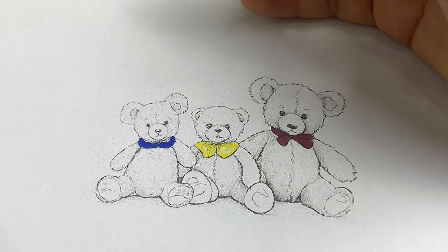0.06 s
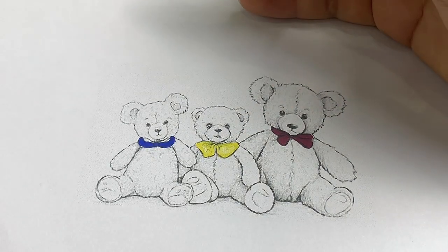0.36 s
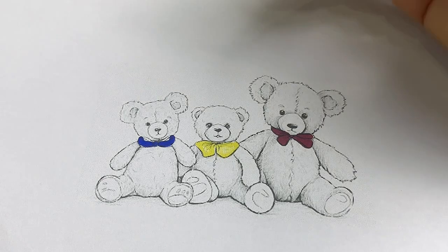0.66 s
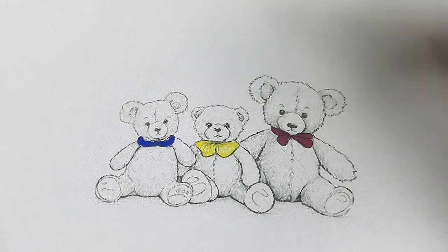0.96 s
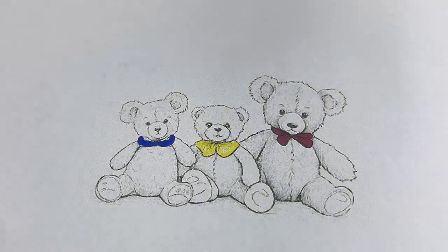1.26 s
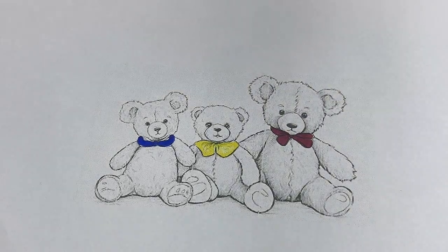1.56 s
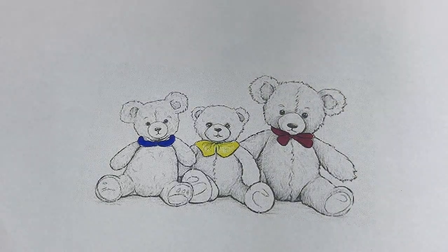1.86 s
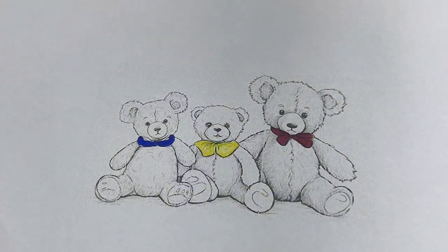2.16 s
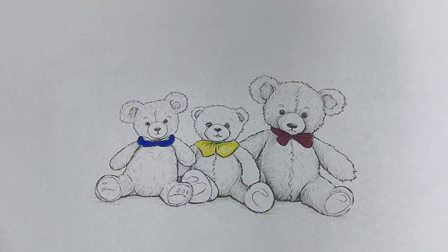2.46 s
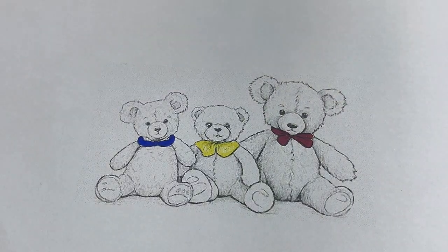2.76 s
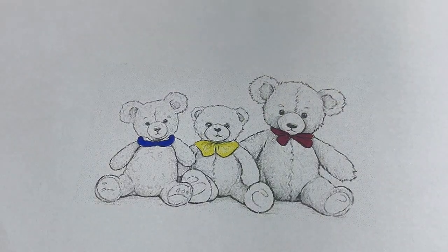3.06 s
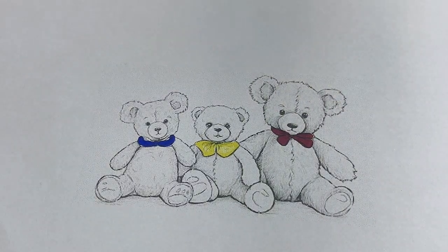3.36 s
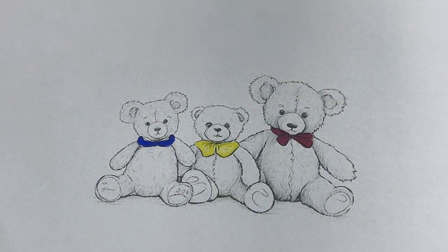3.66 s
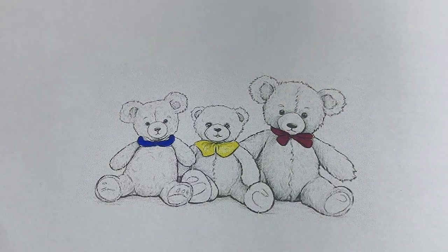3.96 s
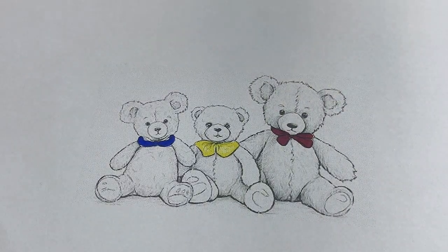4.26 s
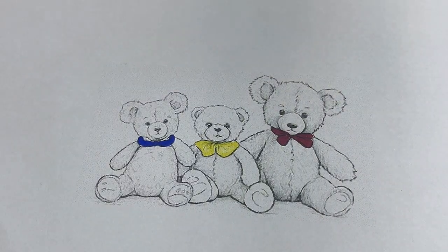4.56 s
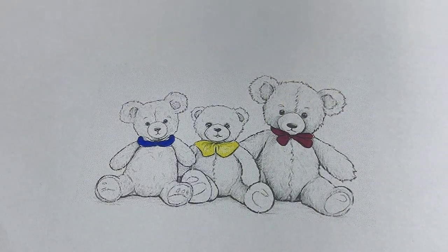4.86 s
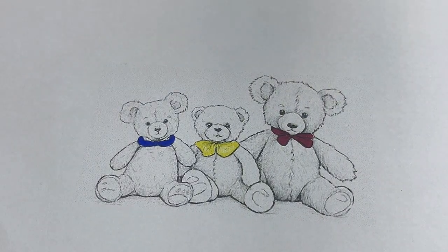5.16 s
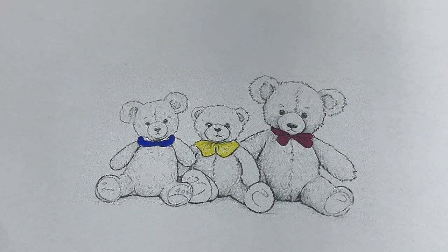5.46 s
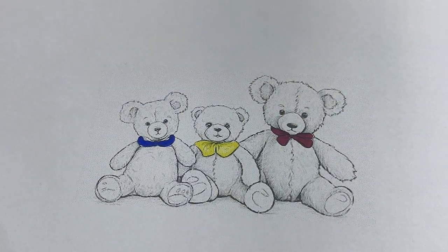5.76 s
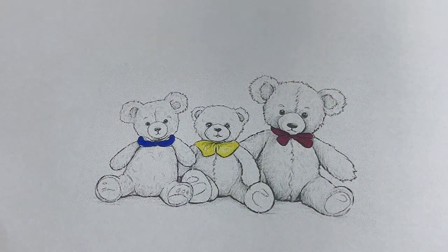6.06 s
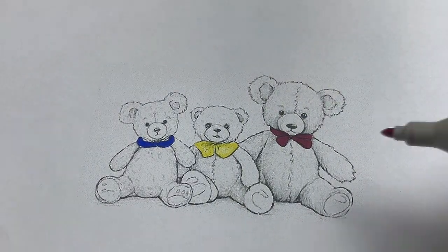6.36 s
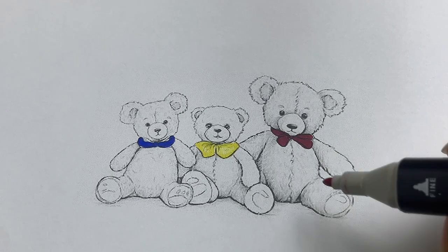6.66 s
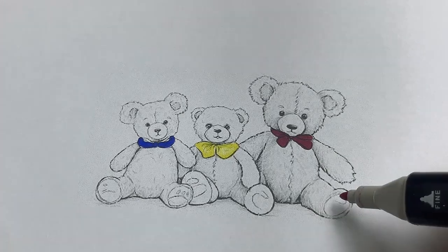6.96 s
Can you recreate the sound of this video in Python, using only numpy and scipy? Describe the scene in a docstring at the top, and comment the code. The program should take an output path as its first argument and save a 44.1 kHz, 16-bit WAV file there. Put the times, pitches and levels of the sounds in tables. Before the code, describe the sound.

A low steady hum and faint hiss fill a quiet small room, with all the handling close to the microphone. A sleeve begins rustling softly at about 1 second. Around 2 seconds a plastic cap ticks several times against a felt-tip marker, rubs down the barrel and snaps shut crisply at 2.3 seconds, with a short room echo. From 3 to 4 seconds there is a soft desk bump, a small tick and a sleeve brushing paper. At about 4.3 seconds another marker scrapes out of a pile, ending in light ticks. Faint squeaks and a click come near 5 seconds, then the cap pulls off with a sharp clack at 5.3 seconds, the loudest moment. Short plastic slides, dull hand rubs and more rustling follow around 6 seconds, and the hand settles on the paper with a soft thud at about 7 seconds.

```python
"""Swapping felt-tip markers

At a desk in a quiet, humming room, close to one microphone, a cap ticks against its barrel, rubs home
and snaps shut. A sleeve rustles, the next marker scrapes out of the pile and its cap comes off with a
clack; plastic slides in short strokes and the hand settles on the paper. Impacts excite damped modes
of the plastic, sliding friction makes noise from many tiny slips, and the walls add a short echo."""
import sys
import numpy as np
from scipy import signal
from scipy.fft import rfft, irfft, next_fast_len
from scipy.io import wavfile
from scipy.ndimage import uniform_filter1d

SR = 44100
rng = np.random.default_rng(int(sys.argv[2]) if len(sys.argv) > 2 else 0)


def unload_audio(sound):
    """Save the sound as a 16-bit wav file, at the path given as the first command line argument."""
    columns = np.transpose(np.atleast_2d(sound))
    # keep every value between -1 and 1, then stretch to whole-number steps
    steps = np.round(np.clip(columns, -1, 1) * 32767)
    wavfile.write(sys.argv[1], SR, steps.astype(np.int16))


N = 317449
TIME = np.arange(N) / SR


def undb(db):
    """Amplitude ratio of a level in decibels."""
    return 10 ** (np.asarray(db) / 20)


def unit(x):
    """Normalisation to rms 1."""
    return x / np.sqrt(np.mean(x ** 2) + 1e-20)


def unit_energy(x):
    """Normalisation to energy 1."""
    return x / np.sqrt(np.sum(x ** 2) + 1e-20)


def at_level(x, db):
    """Equivalent level: x gets the energy of 5 ms of sound at an rms level of db."""
    return undb(db) * unit_energy(x) * np.sqrt(SR / 200)


def fade(t, t60):
    """Exponential decay, by 60 dB in t60 seconds."""
    return np.exp(-np.log(1000) * t / max(t60, 1e-4))


def add(out, start, x):
    """Superposition of x on out from start seconds."""
    i = int(start * SR)
    out[i:i + len(x)] += x[:N - i]


def colour(x, points, tilt_db=0):
    """Minimum-phase filter through (f/Hz, gain/dB) points, tilted by tilt_db an octave."""
    size = 2 * next_fast_len(len(x) // 2 + 1024)
    hz, db = np.transpose(points)
    octave = np.log2(np.maximum(np.arange(size // 2 + 1) * SR / size, 1))
    gain_db = np.interp(octave, np.log2(hz), db)
    gain_db += tilt_db * np.clip(octave, np.log2(hz[0]), np.log2(hz[-1]))
    cepstrum = irfft(gain_db * np.log(10) / 20)
    cepstrum[1:size // 2] *= 2  # folding the cepstrum makes the filter causal
    cepstrum[size // 2 + 1:] = 0
    return irfft(rfft(x, size) * np.exp(rfft(cepstrum)))[:len(x)]


def wander(rate):
    """Random modulation of rms 1, interpolated between rate values a second."""
    hold = int(SR / rate)
    steps = np.repeat(rng.standard_normal(N // hold + 1), hold)
    return unit(uniform_filter1d(steps, hold)[:N])


def friction(n, rate, spread_db):
    """Sliding friction as shot noise: on average rate slips a second, of uneven size."""
    slips = rng.random(n) < rate / SR
    return unit(slips * rng.standard_normal(n) * undb(spread_db * np.minimum(rng.exponential(size=n), 4)))


def slides(events, spectrum, rate, spread_db):
    """Friction noise follows sliding speed, which rises linearly and dies away exponentially."""
    out, t = np.zeros(N), TIME[:SR // 2]
    for start, db, rise, t60, tilt_db in events:
        speed = np.minimum(t / rise, 1) * fade(np.maximum(t - rise, 0), t60)
        noise = unit(colour(friction(len(t), rate, spread_db), spectrum, tilt_db))
        add(out, start, undb(db) * speed * noise)
    return out


def impacts(events, spectrum, modes, ring_db, rattle_db):
    """Impact sound: an impulse, a quick rattle on hand and desk, and free decay of the plastic's modes."""
    out, t = np.zeros(N), TIME[:SR // 10]
    ring = unit_energy(sum(undb(db) * np.exp(-np.pi * width * t) * np.sin(2 * np.pi * hz * t)
                           for hz, width, db in modes))
    for start, db, tilt_db, t60 in events:
        force = undb(rattle_db) * unit_energy(rng.standard_normal(len(t)) * fade(t, t60))
        force[0] += 1
        sound = colour(force + undb(ring_db) * ring, spectrum, tilt_db)
        add(out, start, at_level(sound, db))
    return out


def room_tone():
    """Stationary background: broadband air noise, with narrow noise bands heard as hum and faint whine."""
    # air spectrum: f/Hz, gain/dB
    spectrum = [(15, -35), (25, -33), (43, -8), (97, -10), (134, -4), (170, -6), (439, -19.5), (489, -22),
                (796, -25.5), (1070, -26), (1190, -27), (2280, -36), (2610, -32.5), (4490, -35.5),
                (16000, -51.5)]
    # hum and whine lines: f/Hz, bandwidth/Hz, level/dB
    hum_lines = [(48.4, 8.2, -68), (83.5, 8, -62.5), (128.1, 10, -57), (146.5, 3, -57.5), (207.2, 10, -62),
                 (244.2, 4, -62.5), (289.3, 10, -62.5), (2720, 120, -79.5), (4490, 60, -78)]
    air = undb(-51) * unit(colour(rng.standard_normal(N), spectrum))
    for hz, width, db in hum_lines:
        phase = 2 * np.pi * hz * TIME
        air += undb(db) * unit(wander(2 * width) * np.sin(phase) + wander(2 * width) * np.cos(phase))
    return air


def reverberation(x, wet_db, t60, build_s):
    """The diffuse field of a small furnished room builds up, then decays exponentially."""
    # spectrum of the reflections: f/Hz, gain/dB
    spectrum = [(200, 0), (1200, -1), (3000, 0), (8000, 2), (15000, -7.5)]
    t = TIME[:SR]
    build_up = 1 - np.exp(-(t / build_s) ** 2)
    tail = colour(rng.standard_normal(SR), spectrum) * fade(t, t60) * build_up
    return undb(wet_db) * signal.fftconvolve(x, unit_energy(tail))[:N]


def desk_thuds():
    """Structure-borne sound: the desk passes mainly the low frequencies of soft contacts."""
    # thuds: t/s, level/dB, rise/s, T60/s, tilt/(dB/octave)
    thuds = [(3.02, -45, 0.024, 0.68, -5.5), (5.38, -42.5, 0.0092, 0.46, 1.5),
             (5.46, -42, 0.028, 0.95, 2.5), (6.09, -48, 0.016, 0.83, -0.5),
             (7.058, -35, 0.0036, 0.096, 2.5)]
    # desk response: f/Hz, gain/dB
    spectrum = [(35, -16), (80, 3.5), (130, -4), (250, -5), (400, -16.5), (1000, -37), (4000, -70)]
    return slides(thuds, spectrum, rate=3000, spread_db=2.5)


def hiss_and_rustle():
    """Incoherent sources add in power: steady microphone hiss and a sleeve's fibres brushing paper."""
    # sweeps of the sleeve: middle t/s, duration/s, level/dB, brightness/dB
    sweeps = [(0.9, 0.18, -56, 15), (1.266, 0.16, -56, 11), (1.523, 0.2, -59.5, 1), (1.75, 0.32, -59, 7),
              (2.57, 0.45, -56.5, 4), (3.14, 0.44, -55, 9), (3.446, 0.25, -46.5, 9), (3.58, 0.28, -43, 4.5),
              (3.868, 0.29, -45, 4), (5.09, 0.43, -50.5, 12), (5.8, 0.23, -52.5, 6), (5.93, 0.14, -48.5, 6),
              (6.18, 0.15, -49.5, 3), (6.5, 0.86, -55, 1), (6.81, 0.17, -50.5, 5), (7.023, 0.34, -55, 0.5)]
    # noise spectrum: f/Hz, gain/dB
    spectrum = [(400, -14.5), (700, -10.5), (1100, -5), (1600, -6.5), (2700, -6), (5500, -7), (8300, -3.5),
                (11000, -8), (13700, -2.5), (16000, -9)]
    microphone_hiss = (np.ones(N), -61, 9.5)  # envelope, level/dB, brightness/dB
    light_rustle = (np.clip((TIME - 0.83) / .04, 0, 1), -57.5, 1.5)  # the sleeve starts at 0.83 s
    layers = [microphone_hiss, light_rustle]
    for middle, length, db, bright_db in sweeps:
        speed = np.cos(np.pi * np.clip((TIME - middle) / length, -.5, .5))
        layers.append((speed, db, bright_db))
    treble_gain = np.sqrt(sum((envelope * undb(db)) ** 2 for envelope, db, _ in layers))
    body_gain = np.sqrt(sum((envelope * undb(db - bright_db)) ** 2 for envelope, db, bright_db in layers))
    noise = unit(colour(friction(N, rate=18000, spread_db=0), spectrum))
    body = signal.sosfiltfilt(signal.butter(3, 7000, fs=SR, output="sos"), noise)
    flutter = undb(.7 * wander(35))
    return flutter * (treble_gain * (noise - body) + body_gain * body)


def hand_rubs():
    """Friction of hand and marker gives dull noise, weak in the treble."""
    # rubs: t/s, level/dB, rise/s, T60/s, tilt/(dB/octave)
    rubs = [(1.22, -55.5, 0.026, .2, 1.5), (2.074, -49, .01, 0.8, -3.5), (2.165, -43.5, 0.003, 0.22, -2.5),
            (5.19, -53, 0.017, 0.58, 0), (5.362, -44, .005, 0.82, 0.5), (5.435, -41, 0.018, 0.29, 0.5),
            (6.18, -47, 0.01, 0.22, -1.5), (6.42, -47.5, 0.032, 0.5, -6), (6.571, -43, 0.0047, 0.31, -5),
            (7.001, -39.5, 0.0013, 0.37, -0.5), (7.025, -46.5, 0.015, 0.43, -1)]
    # rubbing spectrum: f/Hz, gain/dB
    spectrum = [(50, -36), (150, 2), (330, 4), (550, -2), (950, -1), (1400, -8), (2100, -13.5), (3200, -25),
                (7000, -29), (15000, -53)]
    return slides(rubs, spectrum, rate=12000, spread_db=0.3)


def squeaks():
    """Friction tones of fingers and a twisted cap glide, waver and break up as the grip changes."""
    # glides: t/s, duration/s, start f/Hz, end f/Hz, level/dB, relative frequency waver
    glides = [(3.564, 0.156, 1080, 994, -64, 0.07), (4.84, .09, 12400, 14000, -68, .012),
              (4.878, 0.079, 11800, 14800, -57, .012), (4.95, 0.25, 7350, 7300, -73, 0.03),
              (5.155, .06, 14700, 12600, -56, .012), (5.16, 0.068, 13300, 11700, -62, .012),
              (5.627, 0.123, 1400, 1346, -61.5, 0.073), (5.776, 0.16, 1380, 1300, -64.5, 0.1)]
    out = np.zeros(N)
    for start, length, start_hz, end_hz, db, waver in glides:
        n = int(length * SR)
        hz = np.linspace(start_hz, end_hz, n) * (1 + waver * wander(710)[:n])
        grip = undb(4.5 * wander(60)[:n])
        tone = np.sin(2 * np.pi * np.cumsum(hz) / SR)
        add(out, start, undb(db) * unit(np.hanning(n) * grip * tone))
    return out


def plastic_strokes():
    """Sliding friction of plastic gives short bursts of bright noise."""
    # strokes: t/s, level/dB, rise/s, T60/s, tilt/(dB/octave)
    strokes = [(.55, -56.5, .004, .1, 3), (1.82, -47, 0.017, 0.089, 16), (1.961, -37, 0.0029, 0.061, -.5),
               (2.563, -54, .003, 0.091, 3), (2.638, -48, .001, 0.079, 11), (4.286, -42, 0.002, 0.23, 1.5),
               (4.4665, -34.5, .001, 0.37, 2), (5.409, -32.3, .001, 0.25, 2.5),
               (5.962, -37.5, 0.0033, 0.37, 1.5), (6.089, -35, 0.0063, 0.26, 2.5),
               (6.945, -45.5, .001, 0.27, 4.5)]
    # sliding plastic: f/Hz, gain/dB
    spectrum = [(530, -20), (1100, -4), (1800, -8.5), (2900, -1.5), (3500, -4), (4700, -8), (6000, -1.5),
                (7900, -0.5), (9100, -2), (11500, -7), (14300, 0.5), (16000, -21)]
    return slides(strokes, spectrum, rate=12000, spread_db=-1.5)


def pile_scrape():
    """Uneven friction of a barrel on its neighbours: one pull, then a light drag until it comes free."""
    # barrel on barrel: f/Hz, gain/dB
    spectrum = [(210, -26), (350, -3), (373, -10), (467, -5), (674, -3.5), (754, -11), (844, -10),
                (1340, -12.5), (1820, -6.5), (3450, -6), (4380, -8.5), (7190, -1), (13900, -8.5),
                (14800, -2), (16000, -56)]
    start_s, fastest_s, free_s = 4.255, 4.386, 4.646
    peak_db, drag_db, rise_db_per_s, fall_db_per_s = -34, -47, 158, 147
    since = TIME - fastest_s
    pull_db = peak_db + np.minimum(rise_db_per_s * since, -fall_db_per_s * since)
    level_db = np.where(since > 0, np.maximum(pull_db, drag_db), pull_db)
    touching = (TIME > start_s) * fade(np.maximum(TIME - free_s, 0), t60=.04)
    catching_db = 0.74 * wander(70)
    noise = unit(colour(friction(N, rate=17000, spread_db=1), spectrum))
    return touching * undb(level_db + catching_db) * noise


def marker_knocks():
    """Heavy damping: the hand stops the marker's hollow lowest mode after a short ring."""
    # knocks: t/s, level/dB, f/Hz, T60/s
    knocks = [(2.075, -44, 510, 0.076), (2.2458, -33.5, 723, 0.027), (2.253, -36, 456, 0.03),
              (2.2604, -29, 920, 0.018), (2.265, -34.5, 535, 0.036), (2.3326, -25, 330, 0.011),
              (2.448, -48.5, 496, 0.063), (5.364, -54, 950, 0.012)]
    out, t = np.zeros(N), TIME[:SR // 10]
    for start, db, hz, t60 in knocks:
        onset = 1 - np.exp(-t * hz)  # a soft contact lasts about one cycle
        add(out, start, 2 * undb(db) * onset * fade(t, t60) * np.sin(2 * np.pi * hz * t))
    return out


def plastic_ticks():
    """Light impacts rattle and excite one damped resonance, which depends on the point of contact."""
    # ticks: t/s, level/dB, tilt/(dB/octave), rattle T60/s, ring f/Hz, relative ring level/dB
    ticks = [(1.258, -57, -1, .015, 3000, -2), (1.9784, -34, -2, 0.011, 2450, 4),
             (2.011, -32.5, -1.5, 0.025, 13300, 3), (2.0242, -43, -0.5, 0.014, 3400, -21),
             (2.0632, -35.5, 2, 0.0097, 9600, 1), (2.1, -35.5, -1, 0.017, 3530, -8),
             (2.109, -44.5, -2, .014, 7800, -6), (2.13, -44, 9, .012, 3400, 2),
             (2.1331, -27.5, 2, 0.015, 3360, -17), (3.229, -39.5, 1, .012, 7850, -7),
             (4.611, -42.5, -1.5, .012, 7500, -5), (4.629, -45, -7, .012, 2600, -6),
             (4.642, -40.5, -2.5, 0.015, 4600, 3), (5.043, -35.5, 7.5, 0.043, 12600, -6),
             (5.657, -53, -2, .035, 3380, 24), (5.766, -40.5, 14, 0.018, 7400, -11),
             (6.4926, -46, 4, .006, 12000, 1)]
    # plastic on plastic: f/Hz, gain/dB
    spectrum = [(200, -8), (700, -5), (1400, -0.5), (2700, -3.5), (3500, -2.5), (6200, -7.5), (8000, -2),
                (11000, -9.5), (14000, 2.5), (16000, -11)]
    out, t = np.zeros(N), TIME[:SR // 20]
    for start, db, tilt_db, t60, hz, ring_db in ticks:
        force = unit_energy(rng.standard_normal(len(t)) * fade(t, t60))
        force[0] += .6
        crack = colour(force, spectrum, tilt_db)
        ring = signal.lfilter(*signal.iirpeak(hz, Q=6, fs=SR), crack)
        sound = unit_energy(crack) + undb(ring_db) * unit_energy(ring)
        add(out, start, at_level(sound, db))
    return out


def cap_seating():
    """Cavity resonance: the hollow cap colours the friction noise as it rubs down the barrel."""
    # pushes: t/s, level/dB, rise/s, T60/s, tilt/(dB/octave)
    pushes = [(2.247, -38.5, 0.0059, 0.24, 1), (2.275, -40.5, 0.0026, 0.2, 0.5),
              (2.305, -42.5, 0.0038, 0.12, -1)]
    # cavity response: f/Hz, gain/dB
    spectrum = [(100, -22), (250, -5), (550, -2.5), (930, -9), (1400, -9), (1950, -9), (2120, -1.5),
                (2400, -16), (2850, -13), (3400, -22), (5500, -21.5), (14000, -40)]
    return slides(pushes, spectrum, rate=12000, spread_db=-1)


def barrel_clacks():
    """Hard impacts excite the barrel's normal modes as the cap comes off."""
    # clacks: t/s, level/dB, tilt/(dB/octave), rattle T60/s
    clacks = [(5.3442, -17.5, 0, 0.022), (5.3485, -27, -1.5, 0.04), (5.3555, -40, 7, .06),
              (5.3695, -46, -1, 0.099)]
    # clack spectrum: f/Hz, gain/dB
    spectrum = [(120, -32), (400, -20), (1000, 0), (1400, -5), (2300, 2), (2800, -9), (4000, 1.5),
                (4600, -7), (6000, 6), (7800, -4.5), (10700, -6), (14100, 1), (16000, -18)]
    # barrel modes: f/Hz, bandwidth/Hz, relative level/dB
    modes = [(1040, 54, 6.5), (2230, 220, -13), (3930, 330, -14), (5200, 300, -2), (6000, 220, 3),
             (6200, 140, 12.5), (6350, 190, -6), (13100, 300, -6), (13900, 350, -1)]
    return impacts(clacks, spectrum, modes, ring_db=-2, rattle_db=7)


def cap_snaps(ring_db, rattle_db):
    """Impulse excitation: the cap jumps over its ridge and rings in its normal modes."""
    # snaps: t/s, level/dB, tilt/(dB/octave), rattle T60/s
    snaps = [(2.3326, -21, 2.7, 0.0036), (2.3334, -40, 4.5, 0.023), (2.3346, -23.5, 3, 0.014),
             (2.344, -37, 10, 0.027), (5.3403, -25.5, 0, 0.02), (5.3626, -28, 8, .008)]
    # snap spectrum: f/Hz, gain/dB
    spectrum = [(200, -11), (600, -15), (1300, -18), (2300, -6), (3300, -1.5), (5000, -7), (7500, -3.5),
                (10500, -6.5), (13500, -1.5), (15500, -2), (17000, -29)]
    # cap modes: f/Hz, bandwidth/Hz, relative level/dB
    modes = [(3170, 170, 1), (4480, 130, 4), (7550, 140, -21), (7640, 99, -5), (8100, 160, -22),
             (10000, 120, 4), (12100, 400, -16), (13930, 270, 11.5)]
    return impacts(snaps, spectrum, modes, ring_db, rattle_db)


def cap_reflections(directions=3):
    """Directivity: the cap radiates a different crack each way; the walls blend them into one tail."""
    cracks = (cap_snaps(ring_db=-13, rattle_db=1.5) for _ in range(directions))
    tails = (reverberation(crack, wet_db=-6.5, t60=0.52, build_s=.004) for crack in cracks)
    return sum(tails) / np.sqrt(directions)


def scene():
    """Superposition of direct sound, reflections and room tone, alike in both channels."""
    snaps = cap_snaps(ring_db=0, rattle_db=8)
    taps = barrel_clacks() + plastic_ticks() + marker_knocks()
    rubs = plastic_strokes() + pile_scrape() + hiss_and_rustle() + squeaks() + hand_rubs() + cap_seating()
    thuds = desk_thuds()
    # the hand shields taps and rubs, so less of them reaches the walls
    reflections = cap_reflections() + reverberation(taps + rubs, wet_db=-12.5, t60=0.42, build_s=0.0032)
    mono = snaps + taps + rubs + thuds + reflections + room_tone()
    return np.array([mono, mono])


def record(dry):
    """Band limiting: the recorder's steep low-pass filter cuts the treble above 16 kHz."""
    return signal.sosfilt(signal.ellip(10, .2, 70, 16000, fs=SR, output="sos"), dry)


dry = scene()
out = record(dry)
unload_audio(out)
```